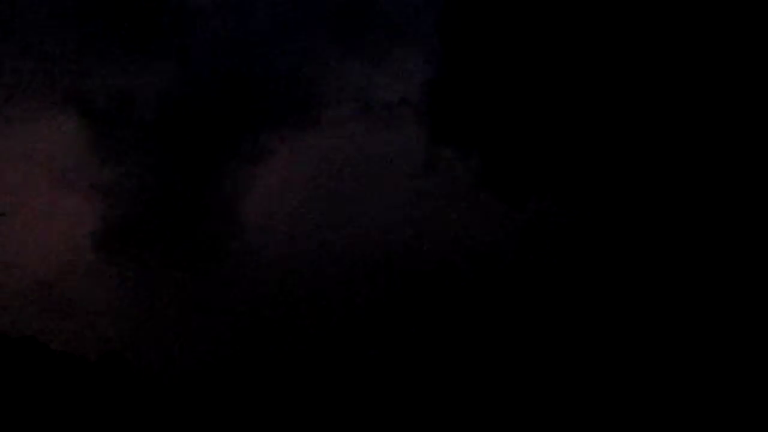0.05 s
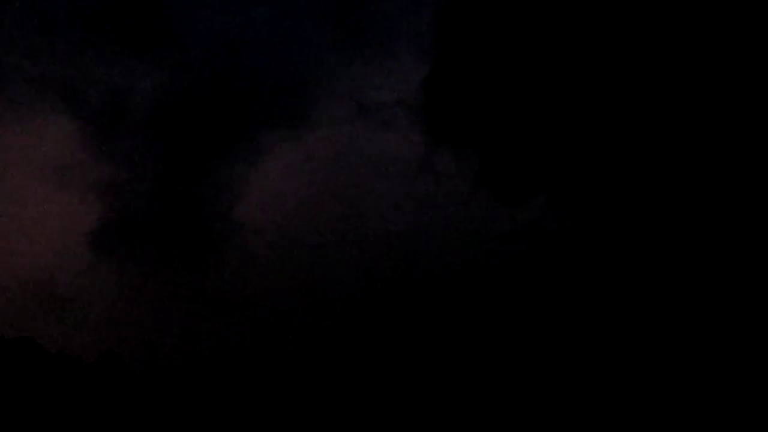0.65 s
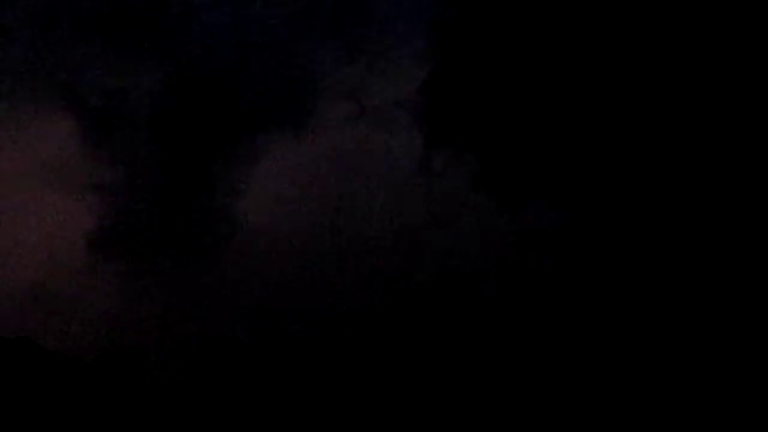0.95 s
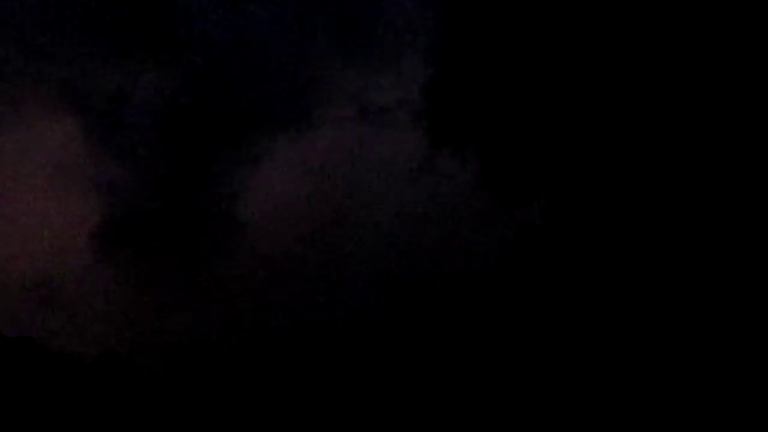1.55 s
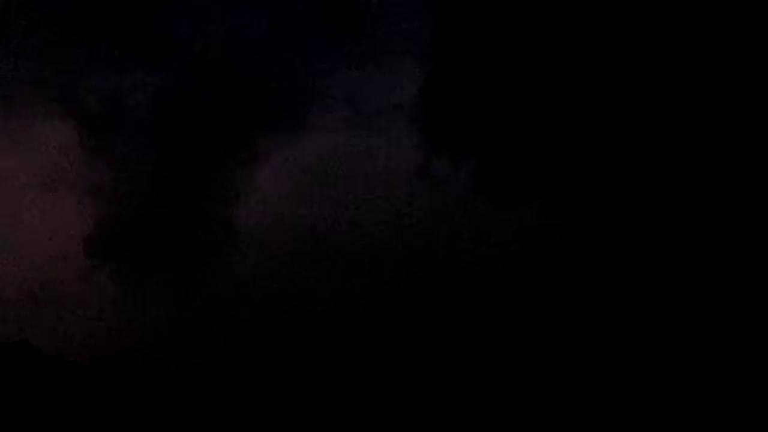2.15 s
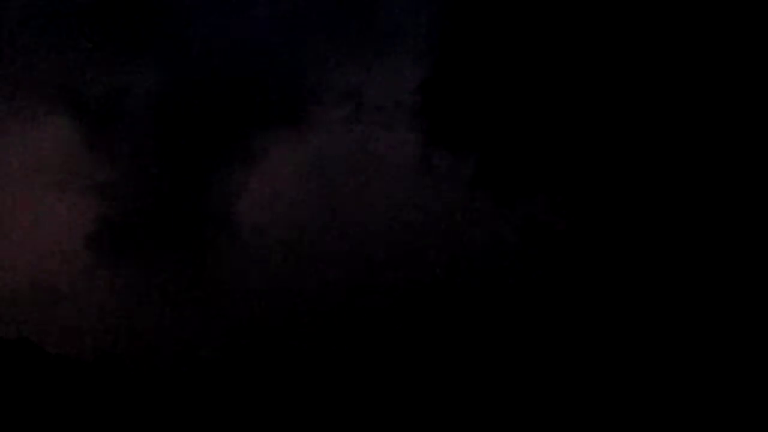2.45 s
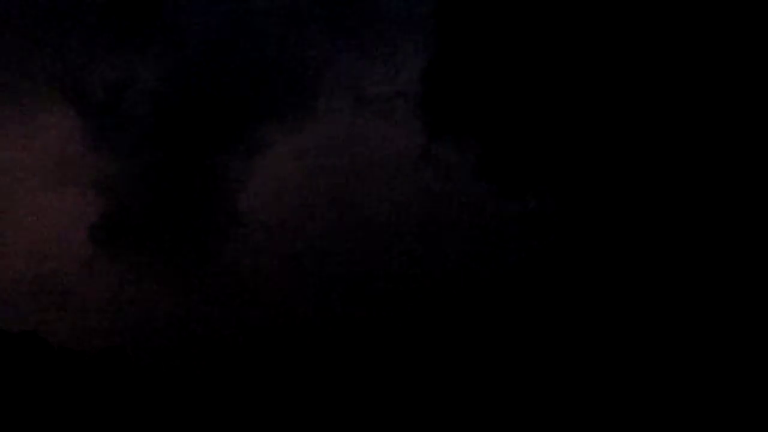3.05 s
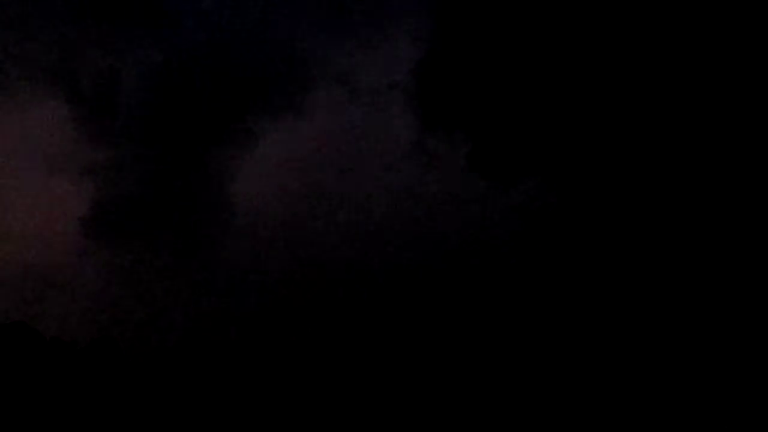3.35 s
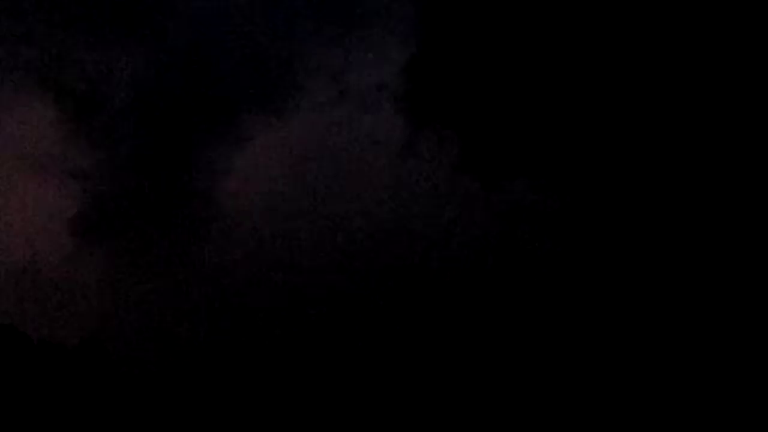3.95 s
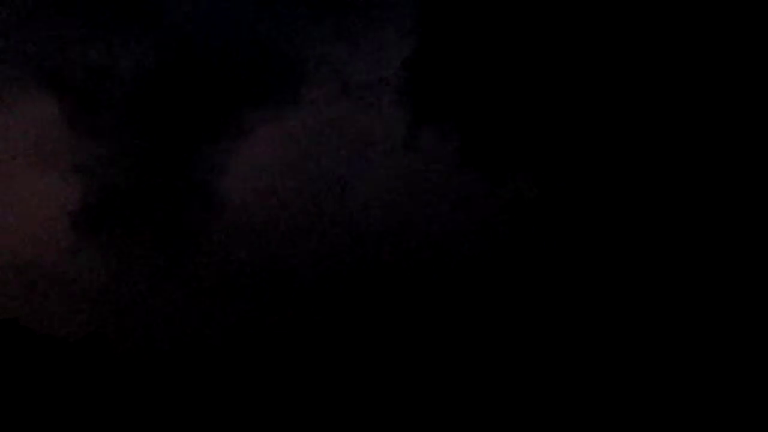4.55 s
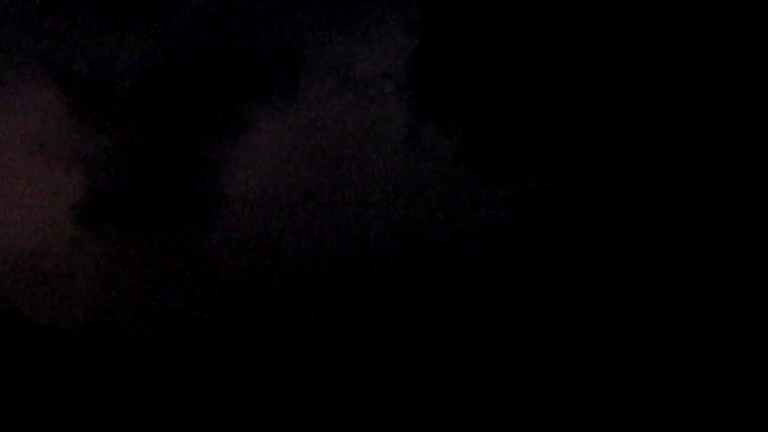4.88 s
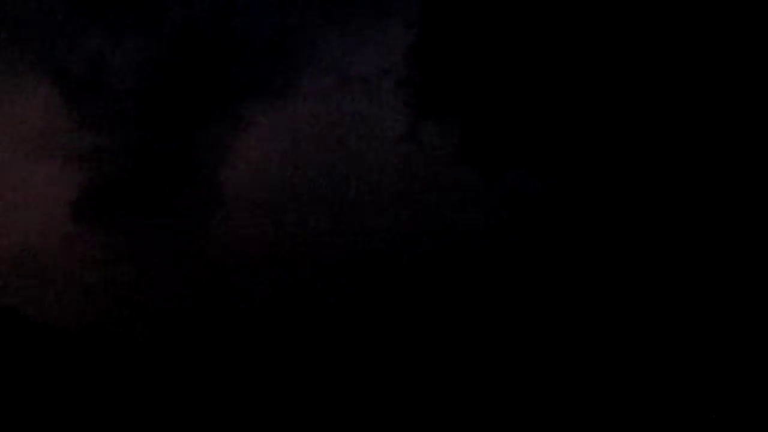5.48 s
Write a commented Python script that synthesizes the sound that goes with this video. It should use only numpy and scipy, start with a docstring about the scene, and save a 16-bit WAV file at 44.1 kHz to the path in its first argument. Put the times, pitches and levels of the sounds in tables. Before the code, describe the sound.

Crickets trill and tree frogs peep on a stormy night as thunder mutters, then breaks into a loud, low rolling peal.

```python
"""Night storm with crickets and frogs

Thunder, the shock waves of lightning, mutters, then breaks into a long low peal that pushes a camera's
gain down. Two kinds of cricket trill by stridulation, a third warbles, and a katydid ticks its wings.
Tree frogs take turns with rising peeps, near and far, and the trees echo them. A thin whistle sounds
far off, a stalk snaps, and a breeze rises over the hush of the air."""
import sys
import numpy as np
from scipy import signal
from scipy.fft import rfft, irfft, next_fast_len
from scipy.io import wavfile
from scipy.ndimage import uniform_filter1d, map_coordinates

SR = 44100
rng = np.random.default_rng(int(sys.argv[2]) if len(sys.argv) > 2 else 0)


def output_pcm(signal):
    """Save a mono or channel-first signal as 16-bit PCM at the path in sys.argv[1].

    Samples are clipped to [-1, 1] before scaling.
    """
    pcm = np.clip(np.atleast_2d(signal).T, -1, 1) * 32767
    wavfile.write(sys.argv[1], SR, np.round(pcm).astype(np.int16))


N = 252252


def thunder():
    """Incoherent shocks add in power; absorption over distance leaves a low boom and a slower roll."""
    # peals: t/s, boom rise/s, boom level/dB, roll level/dB, boom decay/(dB/s)
    peals = [(0.0, 0.066, -39.5, -44.5, 33), (1.34, 0.13, -32.5, -37, 23), (2.08, 0.2, -37, -39.5, 0),
             (2.9, .075, -44, -33, 35.5), (3.385, 0.02, -40, -31, 39), (3.825, 0.016, -28, -29, 21),
             (3.87, 0.092, -10.8, -13, 13.5), (4.55, 0.094, -23, -21, 6.5)]
    # spectra of boom and roll: f/Hz, relative level/dB
    boom_spectrum = [(15, -42), (30, -27), (55, -12), (80, -6), (112, -1.5), (160, -2.5), (200, -11.5),
                     (320, -54), (600, -120)]
    roll_spectrum = [(80, -60), (150, -21.5), (190, 1), (260, -2), (350, -5), (460, -10.5), (600, -21.5),
                     (800, -30.5), (1300, -50), (3000, -91)]
    # strong shock fronts: t/s, relative level/dB, f/Hz
    fronts = [(3.885, -3.5, 106), (3.972, -3.5, 132), (4.157, -5, 114), (4.238, -3.5, 306),
              (4.384, -1.5, 200)]
    boom_power = roll_power = amp(-54.5) ** 2  # the far storm never falls silent
    for s, rise, boom_db, roll_db, fade_db in peals:
        boom_power += (amp(boom_db) * peal(s, rise, fade_db)) ** 2
        roll_power += (amp(roll_db) * peal(s, rise * 2.2, fade_db / 1.31)) ** 2
    boom = np.sqrt(boom_power) * amp(0.35 * wobble(15)) * coloured(shocks(rate=1500), boom_spectrum)
    roll = np.sqrt(roll_power) * amp(0.53 * wobble(18)) * coloured(shocks(rate=700), roll_spectrum)
    claps, t = np.zeros(N), clock(SR // 8)
    for s, db, hz in fronts:
        cycles = t * hz  # each front swings for a cycle or two
        add(claps, s, amp(db - 1) * cycles * np.exp(1 - cycles) * np.sin(2 * np.pi * cycles))
    return boom + roll + claps


def peal(s, rise, fade_db):
    """Travel time shapes the envelope: farther parts of a flash arrive later and weaker."""
    t = clock() - s
    return np.sin(np.pi / 2 * np.clip(t / rise, 0, 1)) * amp(-fade_db * np.maximum(t - rise, 0))


def shocks(rate):
    """Kinks in a lightning channel radiate random impulses, which a house wall reflects."""
    kicks = (rng.random(N) < rate / SR) * rng.choice([-1, 1], N)
    return kicks + 0.33 * delayed(kicks, .018)


def cricket(hz, rate, fall_hz, scatter_hz, wet):
    """Stridulation: each wing closure draws the file across the scraper, giving a falling tone."""
    strokes = np.cumsum(rate * (1 + .02 * wobble(5))) / SR + rng.random()
    progress = np.minimum(strokes % 1 / .7, 1)  # sounding for 70% of each cycle
    pitch = hz - fall_hz * (progress - .5) + scatter_hz * wobble(50)
    phase = 1.16 * rng.standard_normal(1000)[strokes.astype(int)]  # each stroke starts out of step
    envelope = np.sin(np.pi * progress) * amp(1.5 * wobble(21))
    song = envelope * (tone(pitch, phase) + amp(-46) * tone(2 * pitch, phase))
    return unit(song + wet * trees(song, t60=0.13, build=.003))


def low_crickets():
    """Superposition of singers near 7 kHz, each chirping at its own pace; the chorus surges at times."""
    # singers: f/Hz, stroke rate/Hz, fall per stroke/Hz, chirp rate/Hz, droop per chirp/Hz, rel. level/dB
    singers = [(6986, 32, 50, 2.1, 21, -5.5), (7050, 35.5, 260, 3.9, 243.5, -7),
               (6923, 48, 380, 4.2, 261.7, -5.5), (6812, 27, 180, 4, 195, -11.5),
               (6850, 90, 760, 5.1, 152, -15)]
    # loud chirps of the chorus: t/s
    surges = [1.1, 1.39, 1.6, 1.83, 2.06, 2.76, 3.28, 4.08, 4.35, 5.02, 5.28]
    chorus = np.zeros(N)
    for hz, rate, fall_hz, pace, droop_hz, db in singers:
        progress = (pace * clock() + 0.1505 * wobble(2) + rng.random()) % 1
        song = cricket(hz - droop_hz * (progress - .5), rate, fall_hz, scatter_hz=18, wet=0.96)
        chorus += amp(db) * (1.35 + np.sin(np.pi * progress)) * song
    surge_db = 6 * bumps(surges, half_s=.05) - 2.5 * bumps(surges, half_s=.15)  # easing off either side
    return amp(-30 + 0.46 * wobble(9) + surge_db) * unit(chorus)


def high_crickets():
    """Steady stridulation near 8.4 kHz; at times the nearest singer rests and the others soften."""
    # singers, nearest first: f/Hz, stroke rate/Hz, fall per stroke/Hz, level/dB
    singers = [(8382, 33, 70, -36.5), (8393, 39.8, 670, -37), (8146, 43, 780, -43.5)]
    # centres of the rests: t/s
    rests = [.25, .8, 1.46, 2.93, 3.99, 4.51, 5.15]
    near, *others = [amp(db) * cricket(hz, rate, fall_hz, scatter_hz=27.93, wet=0.85)
                     for hz, rate, fall_hz, db in singers]
    resting = bumps(rests, half_s=0.036, power=4)
    return near * np.clip(1 - resting, 0, 1) + sum(others) * (1 - 0.3 * resting)


def warbling_cricket():
    """Frequency modulation: the pitch arches over every stroke of a thin trill that warms up."""
    # course of the trill: t/s, f/Hz, level/dB
    course = [(0, 8950, -68), (.5, 9320, -65), (.9, 9350, -52), (1.7, 9480, -49), (2.3, 9600, -47.5),
              (3.3, 9570, -47), (5.72, 9410, -45)]
    hz, db = curves(course)
    strokes = np.cumsum(41.7 * (1 + .005 * wobble(3))) / SR
    arch = np.sin(np.pi * strokes) ** 2
    song = (0.13 + arch) * tone(hz + 480 * (arch - .66) + 18 * wobble(45))
    return amp(db) * unit(song + 0.81 * trees(song, t60=0.21, build=0.001))


def katydid():
    """Heavily damped wing ticks, single or in runs, each a burst of very high noise."""
    # runs: first t/s, last t/s, level/dB
    runs = [(.442, .45, -44), (2.635, 2.71, -43), (3.084, 3.9, -45), (4.53, 4.54, -43.5),
            (5.386, 5.71, -43)]
    tick_rate_hz, t60 = 16.27, 0.012
    ticks, t = np.zeros(N), clock(SR // 50)
    for first, last, db in runs:
        for s in np.arange(first, last, 1 / tick_rate_hz):
            add(ticks, s, amp(db + rng.normal(0, 1.6) - 60 * t / t60))
    return ticks * noise([(5000, -40), (9000, -1), (11000, 3), (13000, -5), (15500, -12)])


def peep(length, start_hz, end_hz, sag_db=0, flick_hz=0):
    """A frequency glide, as from a frog's throat: one rising whistle that may open with a quick flick."""
    t = clock(int(length * SR))
    progress = t / length
    glide_hz = (end_hz - start_hz) * np.sin(np.pi / 2 * progress) ** 1.31
    pitch = start_hz + glide_hz - flick_hz * np.exp(-t / 0.00046)
    envelope = np.minimum(t / 0.0007, 1) * np.minimum((1 - progress) / 0.38, 1)
    sag = amp(-sag_db * np.exp(-((progress - .45) / 0.24) ** 2))
    return envelope * sag * tone(pitch)


def near_frogs():
    """Peeps arrive directly, by reflection from ground and walls, and by scattering from trees."""
    # peeps: t/s, length/s, end f/Hz, relative level/dB, mid-call sag/dB, opening flick/Hz
    peeps = [(.380, 0.032, 4390, -17, 2.5, 900), (1.538, .06, 4390, -19, 9.5, 200),
             (2.587, .044, 4550, -26, -4, 300), (3.301, .027, 4380, -17, 2, 900),
             (4.454, 0.0513, 4405, -19, 10, 200), (5.409, 0.039, 4540, -25.5, -3.5, 300)]
    # reflections from ground and walls: delay/s, amplitude ratio
    echoes = [(.0095, 0.41), (.014, 0.42), (0.021, .3), (.026, 0.29)]
    direct, blur = np.zeros(N), np.zeros(N)
    for s, length, end_hz, db, sag_db, flick_hz in peeps:
        call = amp(db - 1.5) * peep(length, 3814, end_hz, sag_db, flick_hz)
        add(direct, s, call)
        add(blur, s + .012, amp(-4.5) * trees(call, t60=0.48, build=0.0021))
        add(blur, s + .16, amp(-17) * trees(call, t60=0.38, build=.001))  # from the edge of the trees
    return direct + sum(share * delayed(direct, s) for s, share in echoes) + blur


def far_calls(calls, length, start_hz, end_hz):
    """Reverberation: distant calls arrive only as a blur, drawn out by the trees."""
    blur, call = np.zeros(N), peep(length, start_hz, end_hz)
    for s, db in calls:
        add(blur, s, amp(db + 7) * trees(call, t60=16 * length, build=2 * length))
    return blur


def far_frogs():
    """Distant peeps, heard through scattering alone."""
    # peeps: t/s, relative level/dB
    calls = [(.885, -43.5), (1.42, -43), (2.31, -49), (3.07, -51), (3.64, -44), (3.99, -41.5)]
    return far_calls(calls, length=.031, start_hz=3660, end_hz=4220)


def far_whistle():
    """A thin whistle, smeared by reverberation."""
    # whistles: t/s, relative level/dB
    calls = [(1.47, -56), (3.48, -55), (4.7, -53.5)]
    return far_calls(calls, length=.055, start_hz=5400, end_hz=5600)


def stalk():
    """A stalk snaps in the grass: a bright transient with exponential decay."""
    envelope, t60 = np.zeros(N), .04
    add(envelope, 3.273, amp(-28 - 60 * clock(SR // 20) / t60))
    return envelope * noise([(3000, -32), (4600, -7), (6000, -18), (7000, 1), (8000, -14), (12000, -35)])


def air():
    """Broadband noise: the hush of the night, and a breeze rising in the leaves."""
    # spectra of night air and leaves: f/Hz, relative level/dB
    hush_spectrum = [(20, -12), (72, 5.5), (200, 5), (400, 0), (750, -0.5), (1200, -3.5), (2300, -6),
                     (3200, -9), (6000, -12.5), (7500, -10), (9000, -8.5), (10300, -16), (12000, -26),
                     (13300, -30), (15600, -39)]
    leaf_spectrum = [(150, -29), (500, 13), (900, 7), (1500, 2.5), (2400, -2), (4000, -23), (9000, -48),
                     (15000, -47)]
    # envelopes of hush and breeze: t/s, level/dB
    hush_levels = [(0, -38.5), (3, -37.5), (5, -38.5), (5.72, -35.5)]
    breeze_levels = [(0, -62), (1.4, -47.5), (3.3, -44), (4.8, -45), (5.15, -41.5), (5.45, -38),
                     (5.72, -38)]
    hush = amp(curves(hush_levels)[0] + .3 * wobble(5)) * noise(hush_spectrum)
    breeze = amp(curves(breeze_levels)[0] + 1.1 * wobble(10)) * noise(leaf_spectrum)
    return hush + breeze


def trees(x, t60, build, echoes_per_s=3000):
    """Scattering from trunks and leaves: dense echoes build up and die away (t60 and build in s)."""
    t = clock(SR * 3 // 4)
    echoes = rng.standard_normal(len(t)) * (rng.random(len(t)) < echoes_per_s / SR)
    tail = echoes * amp(-60 * t / t60) * (1 - np.exp(-t / build))
    return signal.fftconvolve(x, tail / np.linalg.norm(tail))[:N]


def amp(db):
    """Amplitude ratio of a level in dB."""
    return 10 ** (np.asarray(db) / 20)


def unit(x):
    """Normalisation to rms 1."""
    return x / np.sqrt(np.mean(x ** 2) + 1e-20)


def clock(n=N):
    """Sample times t/s."""
    return np.arange(n) / SR


def curves(rows):
    """Linear interpolation of each column after t/s, one value a sample."""
    times, *columns = np.transpose(rows)
    return [np.interp(clock(), times, column) for column in columns]


def bumps(times, half_s, power=2):
    """Gaussian pulses centred on the times; a higher power flattens their tops."""
    return sum(np.exp(-((clock() - s) / half_s) ** power) for s in times)


def wobble(rate):
    """Smooth random modulation, rate knots a second."""
    knots = rng.standard_normal(int(N * rate / SR) + 4)
    return map_coordinates(knots, [clock() * rate], mode="nearest")


def filtered(x, response):
    """Linear filtering: the spectrum times a frequency response."""
    size = next_fast_len(N + SR // 2)
    return irfft(rfft(x, size) * response(np.fft.rfftfreq(size, 1 / SR)), size)[:N]


def coloured(x, spectrum):
    """Spectral shaping by (f/Hz, level/dB) points, at rms 1."""
    f, db = np.transpose(spectrum)
    return unit(filtered(x, lambda hz: amp(np.interp(np.log(hz + 1), np.log(f), db))))


def noise(spectrum):
    """Gaussian noise shaped by (f/Hz, level/dB) points."""
    return coloured(rng.standard_normal(N), spectrum)


def delayed(x, s):
    """Propagation delay of s seconds."""
    return np.interp(clock() - s, clock(), x, left=0)


def tone(hz, phase=0):
    """A sine of rms 1 whose phase is the integral of frequency."""
    return np.sqrt(2) * np.sin(2 * np.pi * np.cumsum(hz) / SR + phase)


def add(track, s, sound):
    """Superpose a sound on the track at time s."""
    part = track[max(round(s * SR), 0):][:len(sound)]
    part += sound[:len(part)]


def scene():
    """Pressures from all sources add at a single microphone."""
    insects = low_crickets() + high_crickets() + warbling_cricket() + katydid()
    calls = near_frogs() + far_frogs() + far_whistle()
    mono = thunder() + insects + calls + stalk() + air()
    return np.array([mono, mono])


def gain_control(x, limit_db, recovery_db_per_s, window_samples):
    """Automatic gain control: mean power above the limit cuts the gain, which recovers steadily."""
    power = uniform_filter1d(x[0] ** 2, size=window_samples)
    excess_db = np.maximum(10 * np.log10(np.abs(power) + 1e-12) - limit_db, 0)
    ramp = recovery_db_per_s * clock()
    cut_db = np.maximum.accumulate(excess_db + ramp) - ramp
    return x * amp(-uniform_filter1d(cut_db, size=200))


def record(dry):
    """Compression and band limiting: the camera rides its gain slowly, ducks peaks and cuts the top."""
    top_hz = 15750
    ridden = gain_control(dry, limit_db=-13, recovery_db_per_s=8.5, window_samples=1300)
    limited = gain_control(ridden, limit_db=-13, recovery_db_per_s=69, window_samples=400)
    return np.array([filtered(channel, lambda hz: hz < top_hz) for channel in limited])


dry = scene()
out = record(dry)
output_pcm(out)
```